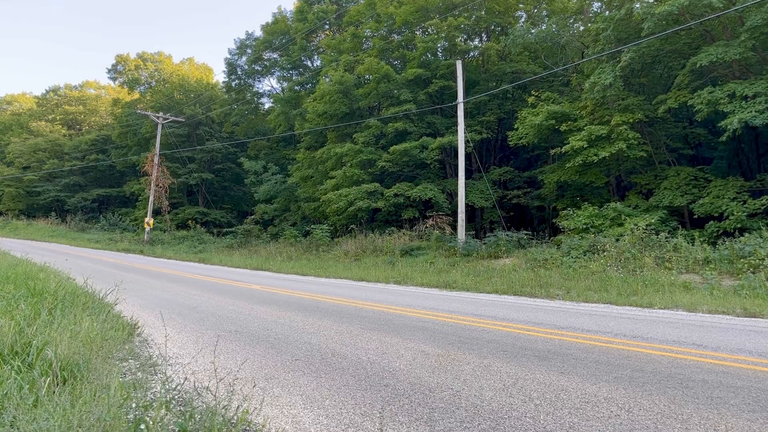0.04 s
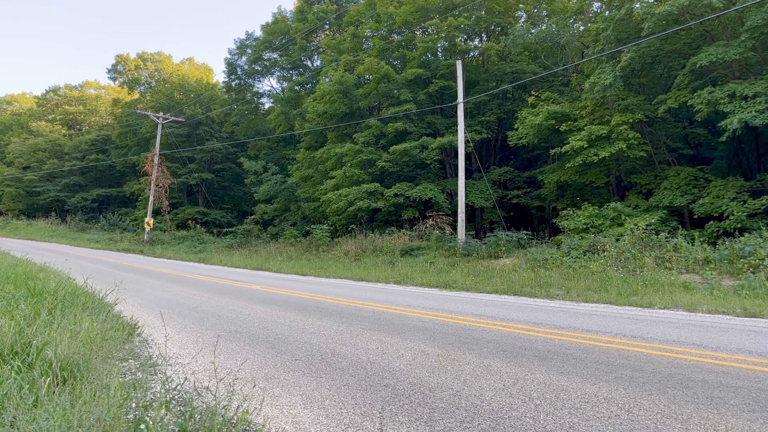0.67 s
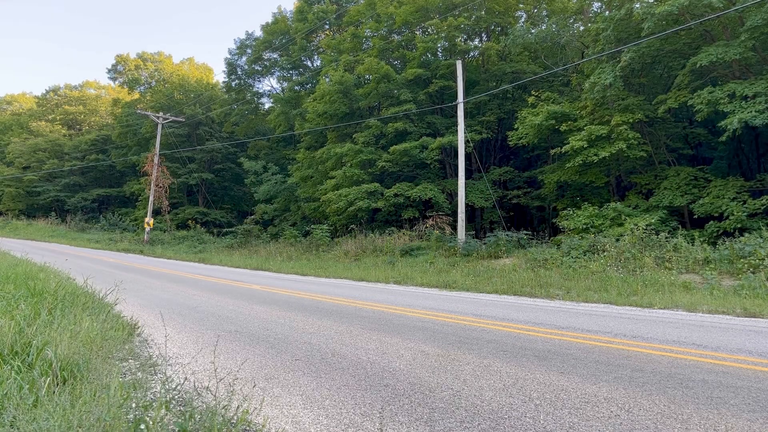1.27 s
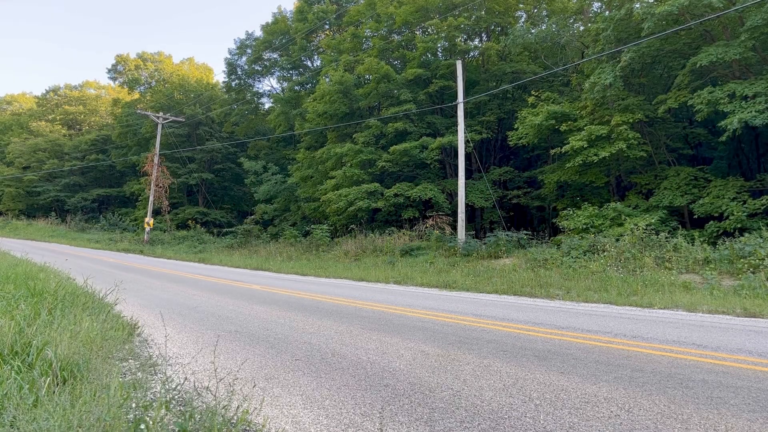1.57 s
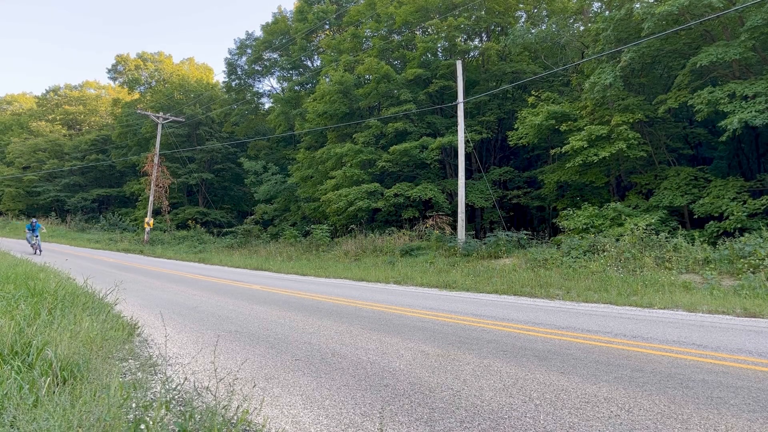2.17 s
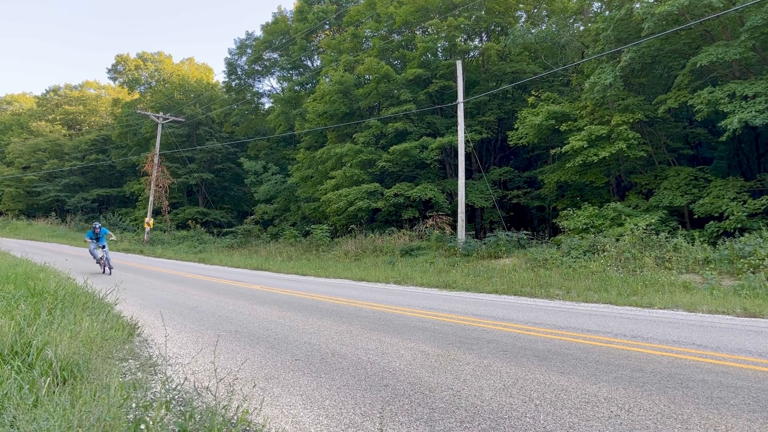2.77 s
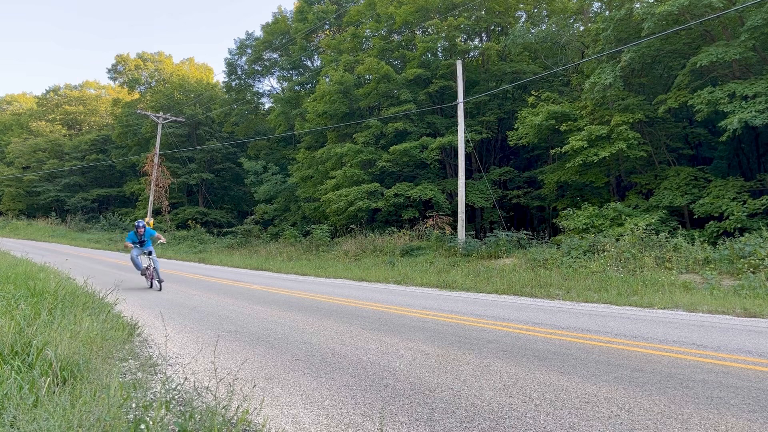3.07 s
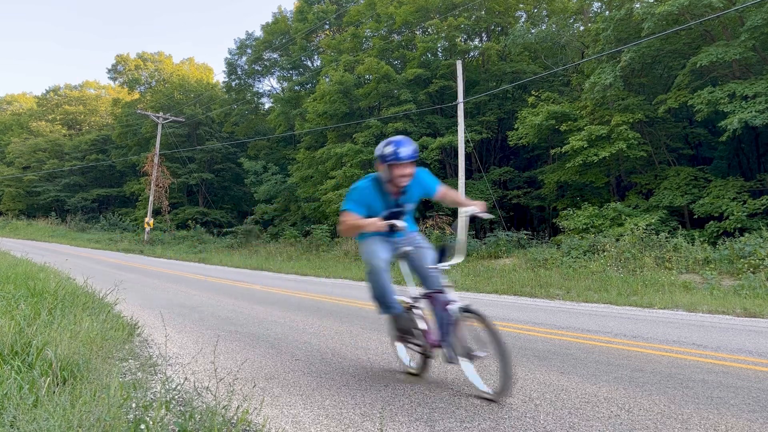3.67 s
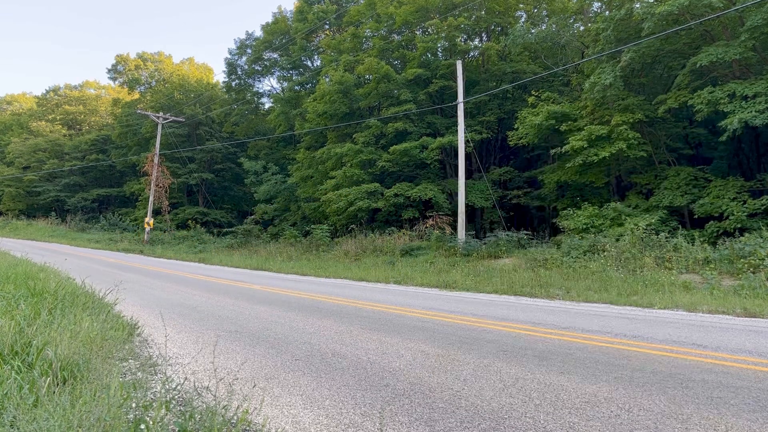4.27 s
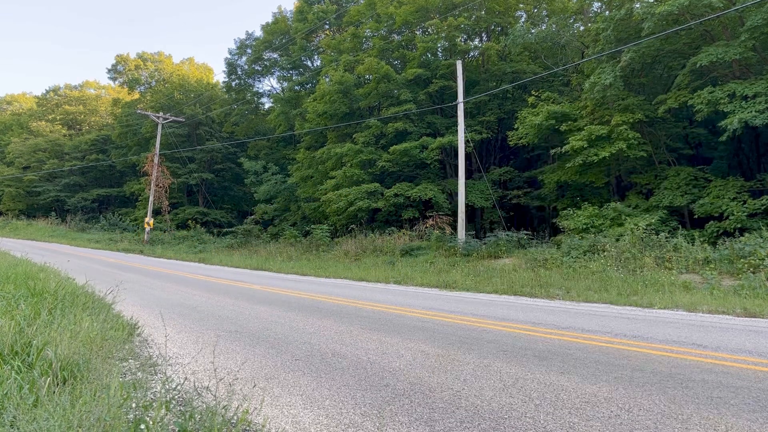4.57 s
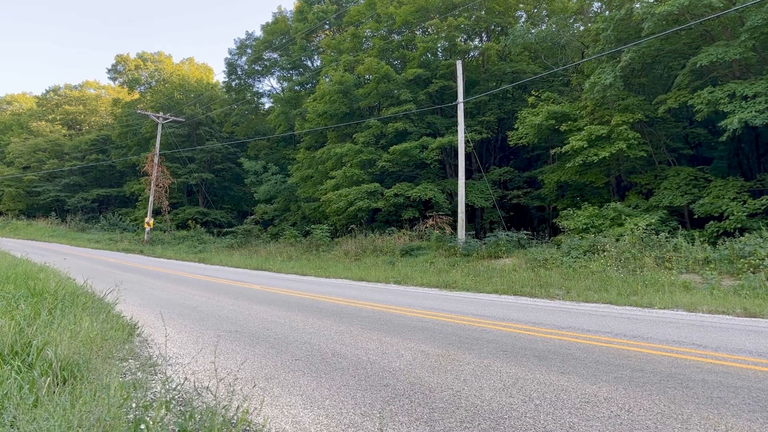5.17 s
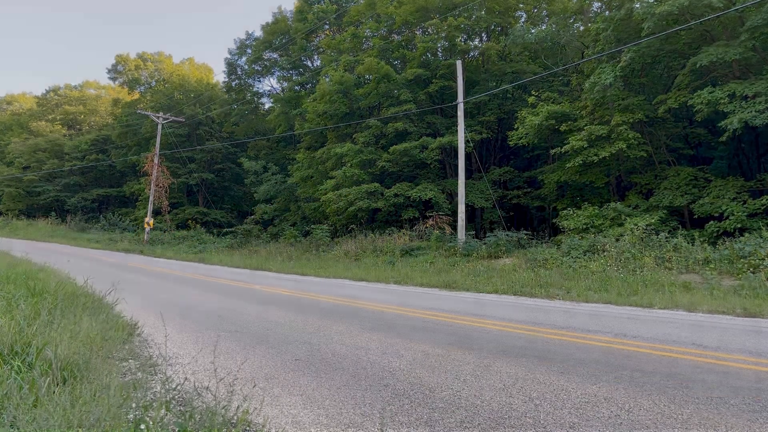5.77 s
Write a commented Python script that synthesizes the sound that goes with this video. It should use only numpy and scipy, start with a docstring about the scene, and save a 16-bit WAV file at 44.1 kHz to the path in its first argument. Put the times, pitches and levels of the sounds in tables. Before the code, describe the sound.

On a country roadside, one near insect repeats short high chirps over a chorus of fainter trills. The hum and gritty crackle of bicycle tyres build, sweep quickly past close to the microphone from left to right, and die away behind a puff of rumbling air. The insects keep singing as low gusts thump on the microphone and a faraway traffic-like rush rises on the right.

```python
"""A country road: a bicycle coasts fast past the microphone, left to right, a metre or two away.
Its tread blocks hum, coarse asphalt rings the tyres, grit crackles, stone chips tick and its wake rumbles.
Insects in the verge sing with scraping wing strokes. After the pass, wind eddies buffet the microphone
while a far rush, like a car's tyres, swells up the road."""
import sys
import numpy as np
from scipy import signal
from scipy.fft import rfft, irfft
from scipy.io import wavfile
from scipy.ndimage import map_coordinates

SR = 44100
rng = np.random.default_rng(int(sys.argv[2]) if len(sys.argv) > 2 else 0)


def master_out(mix):
    """Clip the mix to full scale and print it as 16-bit PCM to the path in sys.argv[1]."""
    frames = np.transpose(np.atleast_2d(mix))
    ceiling = np.clip(frames, -1, 1)
    pcm = np.round(ceiling * 32767).astype(np.int16)
    wavfile.write(sys.argv[1], SR, pcm)


N = 261492
T = np.arange(N) / SR
F = np.maximum(np.arange(N // 2 + 1) * SR / N, 1)

PASS_S, PASS_WIDTH_S, MACH = 3.84, .13, .04  # nearest moment; nearest distance / speed; speed / sound speed
ALONG = (T - PASS_S) / PASS_WIDTH_S  # road position, in nearest distances
DISTANCE = np.hypot(1, ALONG)
TRAVEL_SAMPLES = MACH * PASS_WIDTH_S * DISTANCE * SR  # changing delay gives the Doppler drop
RIGHTWARD = np.sin(np.arctan(ALONG) + .96)  # microphone faces .96 rad up the road
PORT_LAG_SAMPLES = -13 * RIGHTWARD

# rough and smooth road patches: centre_s, half_length_s, gain_db
ROAD_PATCHES = [(2.55, 0.1, 2.5), (2.979, 0.16, 7), (3.448, 0.092, 5.5), (3.759, 0.028, 8),
                (3.875, 0.024, 3), (3.95, 0.046, -3), (4.1, 0.067, 2)]


def undb(db):
    """Decibels to gain."""
    return 10 ** (np.asarray(db) / 20)


def unit(x):
    """Scale to rms 1."""
    return x / np.sqrt(np.mean(x ** 2))


def curve(rows):
    """Join (time_s, value) points at every sample."""
    return np.interp(T, *np.transpose(rows))


def spectrum(rows):
    """Join (freq_hz, value) points on a log-frequency axis."""
    hz, value = np.transpose(rows)
    return np.interp(np.log(F), np.log(hz), value)


def swells_db(rows):
    """Sum of Gaussian level bumps."""
    return sum(db * np.exp(-((T - centre_s) / half_s) ** 2) for centre_s, half_s, db in rows)


def latest(starts_s):
    """Index of the latest event begun at each sample; 0 before the first."""
    return np.maximum(np.searchsorted(starts_s, T) - 1, 0)


def shape(x, gain):
    """Filter by a frequency response; rms 1."""
    return unit(irfft(rfft(x) * gain, N))


def resonance(hz, width_hz):
    """Response of one resonance."""
    return 1 / (1 + 1j * (F ** 2 - hz ** 2) / (F * width_hz))


def walk(rate_hz):
    """Smooth random drift; rms 1."""
    return shape(rng.standard_normal(N), np.exp(-(F / rate_hz) ** 2) * (F > 1))


def port_noise(spread):
    """Noise at the two microphone ports: a shared part plus a diffuse part."""
    return rng.standard_normal(N) + spread * rng.standard_normal((2, N))


def delay(x, lag_samples):
    """Moving fractional delay."""
    return map_coordinates(x, [np.arange(N) - lag_samples], order=3, mode="mirror")


def aim(pair, lag_samples):
    """Set direction by delaying the right port."""
    return np.array([pair[0], delay(pair[1], lag_samples)])


def trees(x, t60_s):
    """Diffuse scatter from the edge of the wood."""
    tail = rng.standard_normal((2, SR // 2)) * undb(-60 * T[:SR // 2] / t60_s)
    return signal.fftconvolve(x[None], tail / np.sqrt(np.sum(tail[0] ** 2)), axes=1)[:, :N]


def still_air():
    """Faint, nearly steady countryside noise."""
    # background spectrum: freq_hz, gain_db
    colour = [(30, -30), (60, 0.5), (250, 3.5), (400, -5), (700, -9), (890, 1.5), (1080, -5.5),
              (1450, -3.5), (2000, -13.5), (3800, -21), (4600, -7), (5500, -8.5), (6100, -16.5), (7200, -8),
              (8500, -51.5), (10800, -27), (14500, -22.5)]
    return shape(port_noise(1), undb(spectrum(colour))) * undb(-52 + .36 * walk(12))


def far_rush():
    """A rush like distant car tyres swells on the right."""
    # rush spectrum: freq_hz, gain_db
    colour = [(100, -12), (200, -3.5), (450, 2), (850, -0.5), (1050, -5.5), (1500, -6), (1900, -18),
              (3000, -23.5), (4400, -27), (5400, -46), (8000, -102.5), (14000, -58)]
    # rush swell: time_s, level_db
    swell = [(0, -63), (4.3, -42), (4.8, -44), (5.2, -37), (5.63, -33.5), (5.93, -34.5)]
    rush = shape(port_noise(.56), undb(spectrum(colour))) * undb(curve(swell) + 1.2 * walk(5.6))
    return aim(rush, lag_samples=-7)


def breeze_and_wake(wake_db=-24.5, late_s=.058, rise_s=.23, fall_s=.13):
    """Moving air rumbles: the breeze, and the wake dragged behind the rider."""
    # rumble spectrum: freq_hz, gain_db
    colour = [(22, -39), (33, -16.5), (42, -2), (55, -1), (80, 4), (115, -3.5), (160, -4), (240, -7),
              (330, -15), (600, -29.5), (1200, -60.5)]
    # breeze strength: time_s, level_db
    breeze = [(0, -53.5), (1.7, -47), (3.3, -41), (4.9, -39), (5.5, -32), (5.93, -41.5)]
    age_s = T - PASS_S - late_s
    wake = undb(wake_db) * np.exp(np.minimum(age_s / rise_s, -age_s / fall_s))
    rumble = shape(port_noise(.44), undb(spectrum(colour)))
    return rumble * np.hypot(undb(curve(breeze)), wake) * undb(.4 * walk(6.5))


def buffets():
    """Each eddy opens with a quick flutter and rocks the pressure for a few slowing, ragged cycles."""
    # eddies of the wake, then the wind: start_s, length_s, nominal_hz, level_db
    eddies = [(3.997, 0.054, 73, -23.5), (4.1, 0.038, 74.6, -28.5), (5.033, 0.032, 138, -22),
              (5.072, 0.039, 62, -23.5), (5.153, 0.029, 102.6, -18), (5.187, .071, 73.6, -14),
              (5.267, 0.0227, 139.3, -7.5), (5.298, .035, 85.6, -11), (5.321, 0.037, 107, -19)]
    flutters = [(start_s, .53 * length_s, 2.08 * hz, db - 6.5) for start_s, length_s, hz, db in eddies]
    ragged_rad = .57 * walk(175) + .27 * np.array([walk(190), walk(140)])
    out = 0
    for start_s, length_s, hz, db in list(eddies) + flutters:
        u = np.clip((T - start_s) / length_s, 0, 1)
        cycles = hz * length_s * (1.324 * u - .36 * u ** 2) + rng.random()
        out = out + undb(db) * np.sin(np.pi * u) * np.sin(2 * np.pi * cycles + ragged_rad)
    return out


def wing(u, hz, crest, bend, rasp):
    """Wing stroke over u = 0..1: pitch follows the scraper's speed, which peaks at u = crest."""
    u = np.clip(u, 0, 1)
    pitch_hz = hz * (1 - bend * (u - crest) ** 2 + rasp * walk(640))
    return np.sin(np.pi * u) ** 1.3 * np.sin(2 * np.pi * np.cumsum(pitch_hz) / SR)


def lisper(gap_s=.038, length_s=.022, second_db=2.5):
    """A small insect lisps very high: two falling strokes, the second stronger."""
    # stroke pairs: first_centre_s, relative_db
    pairs = [(.1156, -74), (.4126, -75), (.8096, -74), (1.1183, -75), (1.4802, -73), (1.8166, -75),
             (2.169, -75), (2.527, -76)]
    start_s, db = np.transpose([(centre_s - length_s / 2 + k * gap_s, pair_db + k * second_db)
                                for centre_s, pair_db in pairs for k in range(2)])
    k = latest(start_s)
    return wing((T - start_s[k]) / length_s, hz=10550, crest=0, bend=.06, rasp=.004) * undb(db[k] + 1)


def triller(rate_hz, hz, duty, crest, bend, db, scatter_db, skip=0, start_cycles=0, drift=.011, gate=1):
    """A far insect strokes on and on with uneven force; skip is the chance of missing a stroke."""
    cycles = start_cycles + np.cumsum(rate_hz * (1 + drift * walk(8.1))) / SR
    force_draw, skip_draw = rng.random((512, 2))[cycles.astype(int) % 512].T
    force = undb(scatter_db * (2 * force_draw - 1)) * (skip_draw >= skip)
    pitch_hz = hz * (1 + drift * walk(15) / 4)
    song = gate * unit(force * wing(cycles % 1 / duty, pitch_hz, crest, bend, rasp=.006))
    return (song + undb(-13) * trees(song, t60_s=.25)) * undb(db)


def fast_triller(half_rest_s=.016):
    """An insect trills in short phrases, resting about two strokes between them."""
    # stroke rate: time_s, rate_hz
    pace = [(.5, 69), (.85, 60), (1.49, 60), (1.7, 68.5), (2.14, 72), (3.3, 70)]
    # rests: centre_s
    rests = [.055, .145, .17, .275, .385, .485, .595, .71, 1.605, 1.71, 1.775, 1.875, 1.965, 2.06, 2.135,
             2.185, 2.3, 2.425, 2.51, 2.59, 2.735, 2.87, 2.99, 3.11, 3.25, 4.27, 4.315, 4.625, 4.84, 5.0,
             5.135, 5.225, 5.4, 5.585, 5.725]
    # song strength: time_s, gain_db
    strength = [(0, 1.5), (.66, 2), (.78, -1.5), (1.0, -3), (1.7, -3), (2.1, -1), (2.4, .5), (3.0, .5),
                (4.4, 2), (5.6, 2.5)]
    to_rest_s = np.min([abs(T - centre_s) for centre_s in rests], axis=0)
    gate = 1 - np.exp(-(to_rest_s / half_rest_s) ** 4)
    song = triller(curve(pace), 5780, duty=.7, crest=0, bend=.1, db=-61.5, scatter_db=1.2,
                   drift=.01, gate=gate)
    return song * undb(curve(strength))


def chorus():
    """Five trillers, each with its own pitch and stroke rate; the lowest two sing in loose runs."""
    # strength of the lowest two: time_s, gain_db
    chatter = [(0, 0), (3.2, 0), (4.3, -5), (5.9, -6)]
    high_rate_hz = curve([(0, 24), (.6, 24.25)])
    high_hz = curve([(0, 6940), (3, 6880), (4.3, 6740), (5.9, 6840)])
    high = triller(high_rate_hz, high_hz, duty=.6, crest=.46, bend=.36, db=-60, scatter_db=1.5,
                   start_cycles=.03)
    faint = triller(23.5, 7280, duty=.6, crest=.4, bend=.2, db=-66, scatter_db=2)
    fast = fast_triller()
    middle = triller(24.6, 5050, duty=.95, crest=0, bend=.15, db=-65, scatter_db=3, skip=.1, drift=.04)
    low = triller(27, 4680, duty=.9, crest=0, bend=.1, db=-64, scatter_db=3, skip=.1, drift=.04)
    return high + faint + fast + (middle + low) * undb(curve(chatter) + 1.5 * walk(6))


def far_insects(rate_hz=22.5, duty=.8):
    """Short bouts of falling wing strokes, uneven in timing, pitch and force."""
    # bouts: start_s, stroke_count, pitch_hz, relative_db
    bouts = [(0, 2, 4680, -1), (.19, 5, 4750, 2), (.57, 3, 4680, -1), (.72, 5, 4700, 1), (1.05, 4, 4750, 0),
             (1.26, 3, 4680, 2), (1.47, 3, 4700, 0), (1.63, 6, 4680, 1), (1.93, 4, 4750, 0),
             (2.18, 6, 4720, 0), (2.57, 6, 4750, 1), (2.9, 4, 4700, 0), (3.17, 4, 4720, 0),
             (4.18, 3, 4700, 0), (4.365, 5, 4680, 1), (4.63, 1, 4660, 0), (4.692, 3, 4660, 0),
             (4.83, 3, 4740, 1), (4.972, 5, 4700, 0), (5.35, 5, 4700, 1), (5.67, 5, 4800, -5)]
    start_s, hz, db = np.transpose([(bout_s + k / rate_hz, bout_hz, bout_db)
                                    for bout_s, count, bout_hz, bout_db in bouts for k in range(int(count))])
    pitch_draw, force_draw, time_draw = rng.standard_normal((len(start_s), 3)).T
    start_s, hz, db = start_s + .004 * time_draw, hz * (1 + .02 * pitch_draw), db + 1.5 * force_draw
    k = latest(start_s)
    song = wing((T - start_s[k]) * rate_hz / duty, hz[k], crest=.1, bend=.16, rasp=.011) * undb(db[k] - 55.5)
    return song + undb(-8) * trees(song, t60_s=.25)


def near_insect(full_stroke_s=.027, lead_s=.0055, opening_s=.112):
    """Chirps of one soft wing stroke and three full ones; softer strokes are shorter and lower."""
    # chirps: last_stroke_s, soft_stroke_relative_db
    chirps = [(0.4566, -42.5), (0.796, -59), (1.185, -56), (1.5602, -49), (2.0004, -47.5), (2.3955, -59),
              (2.7786, -47), (3.143, -49), (3.467, -54.5)]
    # full strokes, slowing and gathering force: before_last_s, relative_db
    full_strokes = [(.0834, -38.5), (.0438, -36.5), (0.00061, -36.5)]
    start_s, db = np.transpose([(last_s - before_s - lead_s, stroke_db) for last_s, soft_db in chirps
                                for before_s, stroke_db in [(opening_s, soft_db), *full_strokes]])
    k = latest(start_s)
    force = undb(db - db.max())[k]
    u = (T - start_s[k]) / (full_stroke_s * (1 + force) / 2)
    tone = signal.hilbert(wing(u, 5030 * (.9544 + .05 * force), crest=.33, bend=.25, rasp=.0074))
    octave = undb(-47) * tone ** 2
    song = np.real(tone + octave) * undb(db[k] + 2.5)
    return song + undb(-21) * trees(song, t60_s=.22)


def low_note(start_s=3.49, length_s=.09, start_hz=232, level_db=-28):
    """A brief low note sags in pitch as the bicycle nears."""
    u = np.clip((T - start_s) / length_s, 0, 1)
    pitch_hz = start_hz * (1 - .3 * u ** 2)
    return undb(level_db) * np.sin(np.pi * u) ** 2 * np.sin(2 * np.pi * np.cumsum(pitch_hz) / SR)


def pebbles():
    """Stone chips tick against the bicycle."""
    # strikes: start_s, pitch_hz, width_hz, decay_s, level_db
    strikes = [(3.2987, 9500, 11000, .0017, -38), (3.6488, 3300, 1800, .002, -31),
               (3.6852, 3600, 2000, .002, -31), (3.7037, 3000, 1800, .004, -28),
               (3.8328, 3500, 2000, .002, -26), (3.842, 3300, 1800, .003, -26),
               (3.8479, 3300, 1800, .002, -25), (3.9011, 2700, 1400, .003, -27)]
    out = 0
    for start_s, hz, width_hz, decay_s, db in strikes:
        age_s = np.maximum(T - start_s, 0)
        ring = shape(rng.standard_normal(N), resonance(hz, width_hz) ** 2)
        out = out + ring * (age_s > 0) * np.exp(-age_s / decay_s) * undb(db)
    return out


def path_loss_db(power, behind_db, bend_db_per_s, emerge_s=2.18):
    """Rolling sound fades with distance, more so from behind and until it clears a grassy bend."""
    astern = (np.maximum(ALONG, 0) / DISTANCE) ** 10  # 0 in front, 1 straight behind
    hidden_s = np.maximum(emerge_s - T, 0)
    return 20 * power * np.log10(DISTANCE) + behind_db * astern + bend_db_per_s * hidden_s


def grit(dull_from_s=3.855, dull_turn_s=.022, fizz_fade_s=.17):
    """Grit crackles and fizzes; treble beams forward from the tyre-road wedge, so it dulls from behind."""
    # crackle spectrum: freq_hz, gain_db
    colour = [(1000, -32), (1600, -1.5), (1730, 4.5), (2500, -0.5), (3400, -1), (4500, -7), (6000, -13),
              (8000, -49), (14000, -48)]
    # added colour from ahead: freq_hz, gain_db
    ahead = [(1800, 2), (2800, 3), (3800, 0), (5000, 0), (6500, -11)]
    # added colour from behind: freq_hz, gain_db
    behind = [(1400, 1), (1750, 0.5), (2400, -1), (3200, -1), (4000, -3), (4900, -2), (6500, -3),
              (10000, -17)]
    # swells and dips in the crackle as the bicycle nears and passes: centre_s, half_length_s, gain_db
    swells = [(3.1, 0.31, 0.7), (3.58, 0.061, 2), (3.705, 0.042, 3.5), (3.785, 0.074, -2),
              (3.842, 0.017, -0.5)]
    force = undb(2.1 * walk(500) + .7 * walk(40))  # single chips, coarser patches
    noise = port_noise(.4) * force
    bright = shape(noise, undb(spectrum(colour) + spectrum(ahead)))
    dull = shape(noise, undb(spectrum(colour) + spectrum(behind)))
    past = (1 + np.tanh((T - dull_from_s) / dull_turn_s)) / 2
    level_db = -27.5 - path_loss_db(power=1.27, behind_db=13.5, bend_db_per_s=3) + swells_db(swells)
    crackle = (bright * (1 - past) + dull * past) * undb(level_db)
    crackle = aim([delay(port, TRAVEL_SAMPLES) for port in crackle], 2.6 - 2 / DISTANCE)
    fizz_colour = [(3000, -25), (6500, 3), (10000, -3), (15000, -7.5)]  # freq_hz, gain_db
    fizz = shape(port_noise(.019) * force, undb(spectrum(fizz_colour)))
    fizz_db = -40 - 15.3 * np.clip((T - PASS_S) / fizz_fade_s, 0, 1)
    return crackle + fizz * undb(fizz_db) / DISTANCE ** 1.3


def tyre_roar():
    """Road texture rings the tyres, a little louder on rough patches."""
    # tyre and road resonances: freq_hz, width_hz, gain_db
    modes = [(551, 95, 2.5), (628, 95, 2.5), (846, 230, 1), (1222, 520, -4)]
    power = sum(abs(undb(db) * resonance(hz, width_hz) ** 2) ** 2 for hz, width_hz, db in modes)
    level_db = -24 - path_loss_db(power=1.4, behind_db=7.5, bend_db_per_s=10) + .17 * swells_db(ROAD_PATCHES)
    pan_db = 4.5 - 7 * RIGHTWARD  # left minus right
    roar = shape(port_noise(.23), np.sqrt(power)) * undb(level_db + np.array([pan_db, -pan_db]) / 2)
    return aim([delay(port, TRAVEL_SAMPLES) for port in roar], PORT_LAG_SAMPLES)


def tread_hum(rear_late_s=.0984):
    """Tread blocks hum in two narrow bands that drop in pitch as the rear wheel passes."""
    # tread bands: pitch_hz, width_hz, gain_db
    bands = [(375, 30, 0), (438, 52, -6.5)]
    power = sum(abs(undb(db) * resonance(hz, width_hz) * resonance(hz, 4 * width_hz)) ** 2
                for hz, width_hz, db in bands)
    level_db = -27 - path_loss_db(power=.945, behind_db=15.5, bend_db_per_s=23.5) + swells_db(ROAD_PATCHES)
    hum = shape(port_noise(.15), np.sqrt(power)) * undb(level_db)
    travel_samples = MACH * np.hypot(PASS_WIDTH_S, T - PASS_S - rear_late_s) * SR
    return aim([delay(port, travel_samples) for port in hum], PORT_LAG_SAMPLES)


def scene():
    """All sources at the two ports."""
    bicycle = tread_hum() + tyre_roar() + grit() + pebbles() + low_note()
    insects = near_insect() + far_insects() + lisper() + chorus()
    air = still_air() + breeze_and_wake() + far_rush() + buffets()
    return bicycle + insects + air


def record(dry, low_hz=38, top_hz=15000, fade_from_s=5.702, fade_db_per_s=30):
    """Left and right differ in level and drift apart in treble phase; band limits, fade-out."""
    # channel balance: freq_hz, left_minus_right_db
    balance = [(60, .5), (130, 1), (300, 5), (550, 2.5), (900, 0), (1400, -1.3), (2200, 2.5), (3600, 5.5),
               (4400, 7), (5000, 4.5), (5600, 6), (6600, .5)]
    # phase between channels: freq_hz, right_lead_half_turns
    phase = [(4300, 0), (5000, .4), (6500, .5), (7900, 1), (9200, 1), (10500, 2), (13000, 2), (14500, 3)]
    tilt_db = spectrum(balance) / 2
    low_cut = 1 / np.sqrt(1 + (low_hz / F) ** 12)
    response = low_cut * np.array([undb(tilt_db), undb(-tilt_db) * np.exp(1j * np.pi * spectrum(phase))])
    fade = undb(-fade_db_per_s * np.maximum(T - fade_from_s, 0))
    sound = irfft(rfft(dry) * response, N) * fade
    return signal.sosfilt(signal.ellip(8, .2, 70, top_hz, fs=SR, output="sos"), sound)


dry = scene()
out = record(dry)
master_out(out)
```